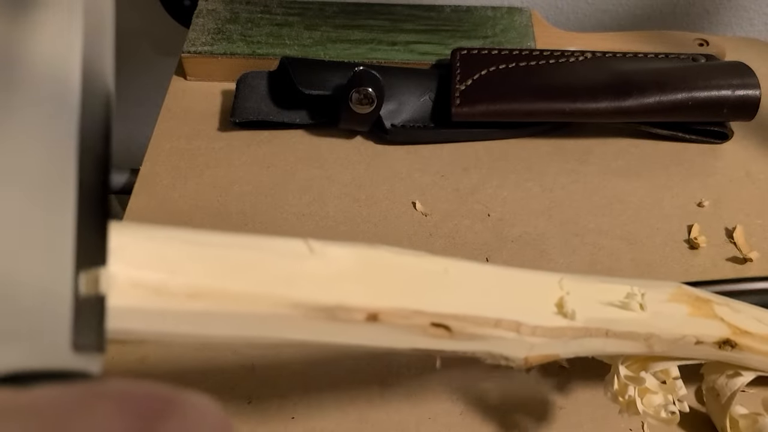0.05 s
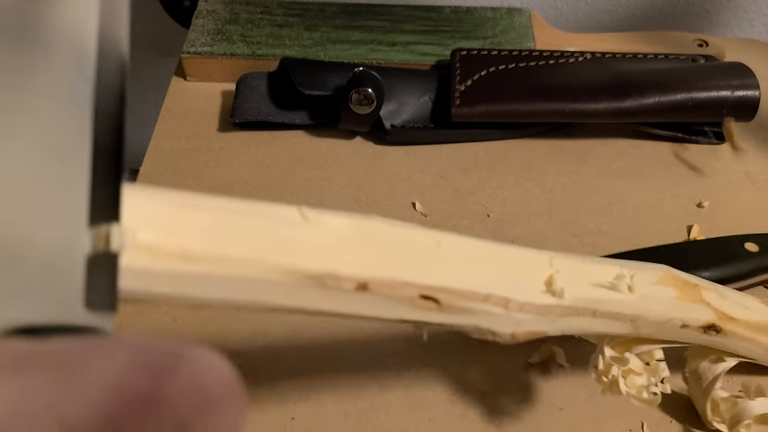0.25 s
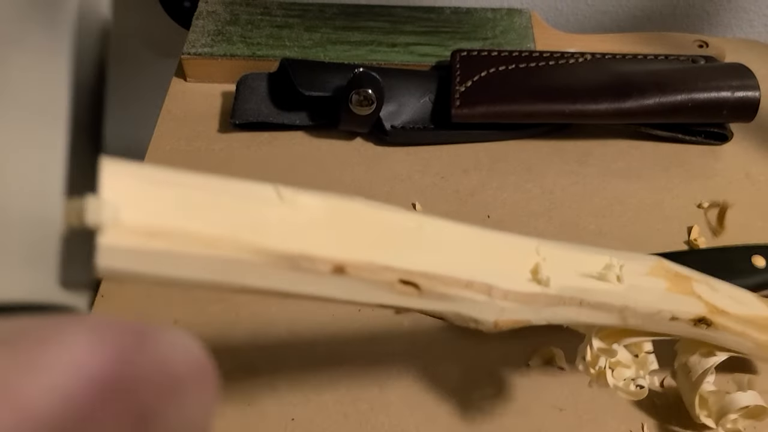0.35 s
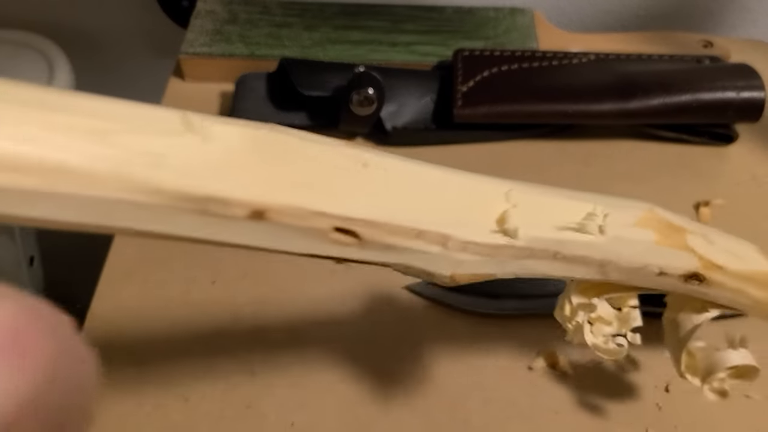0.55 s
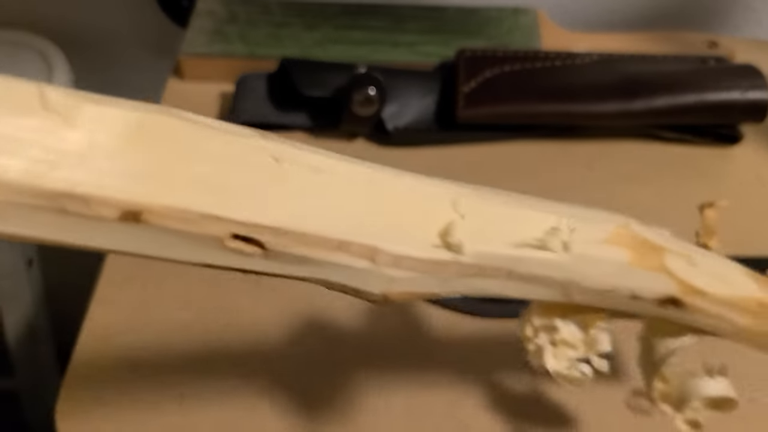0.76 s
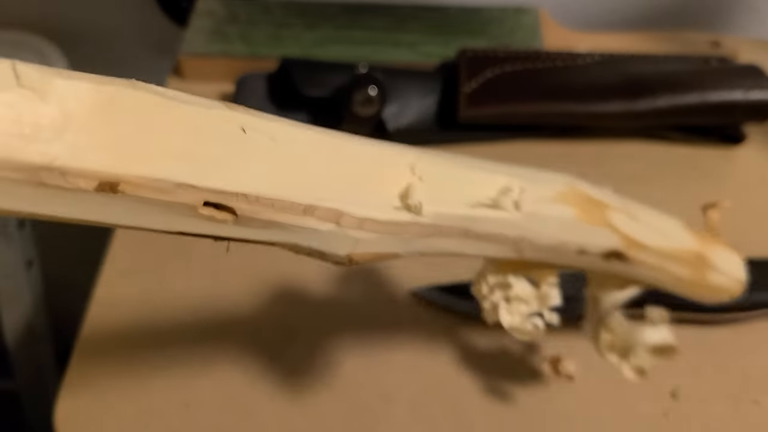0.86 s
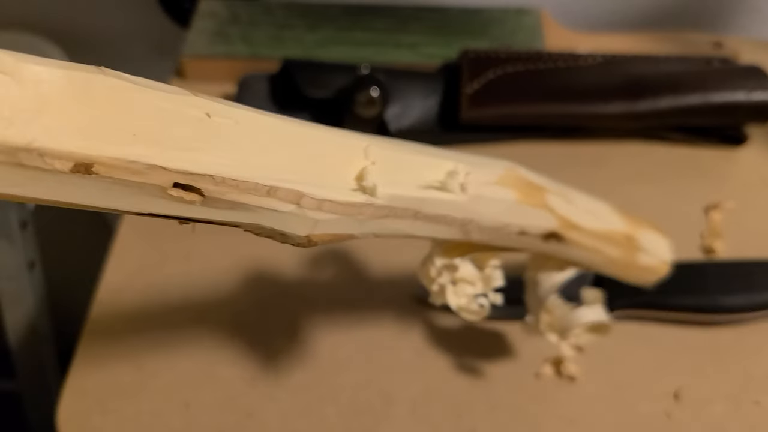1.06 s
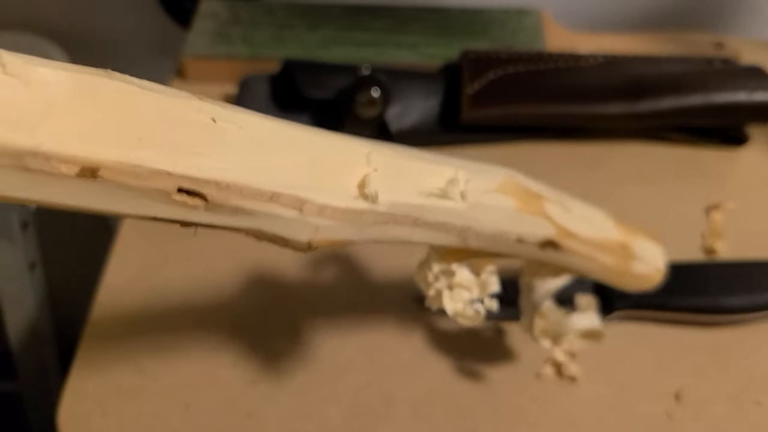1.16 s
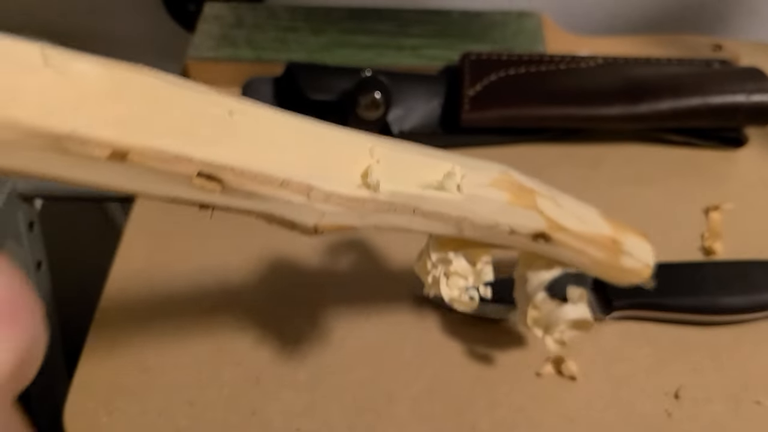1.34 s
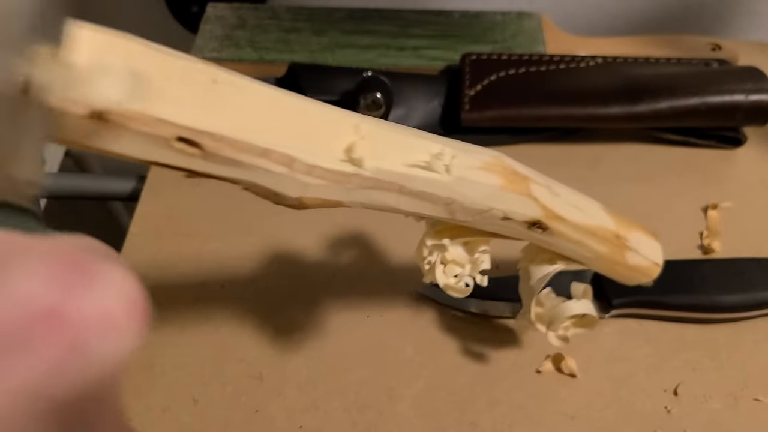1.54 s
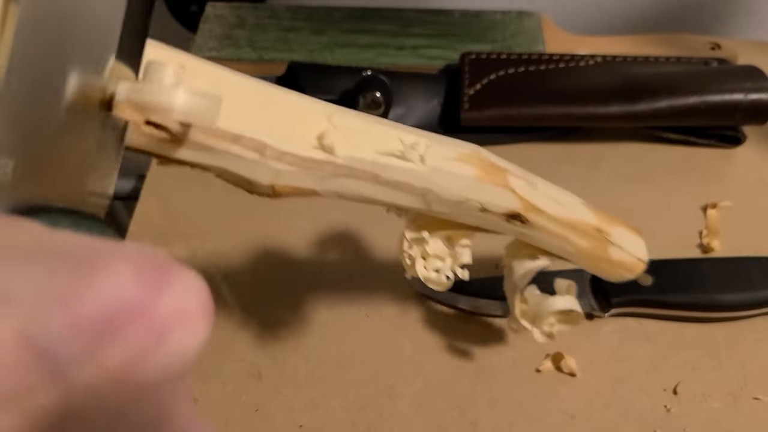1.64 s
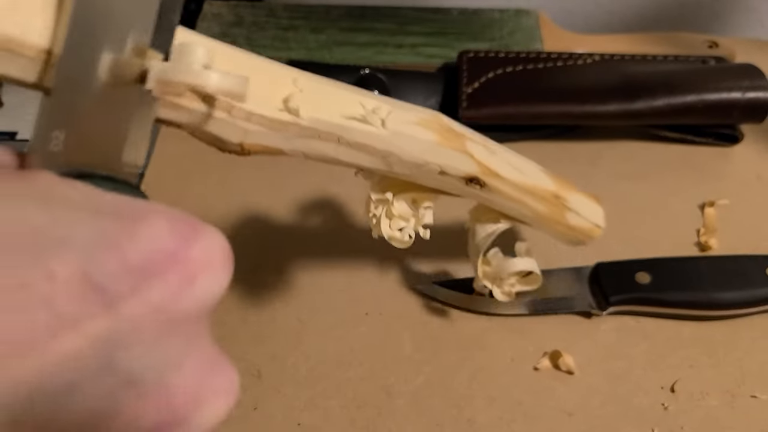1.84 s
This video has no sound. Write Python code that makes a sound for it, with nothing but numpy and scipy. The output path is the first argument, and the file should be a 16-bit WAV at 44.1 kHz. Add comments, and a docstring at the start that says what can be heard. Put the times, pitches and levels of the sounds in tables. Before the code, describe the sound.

A knife lands on a fibreboard table with sharp knocks and a short metallic rattle, settling within half a second; then faint scrapes and tiny fibre ticks on a stick at left, close up in a quiet room.

```python
"""A knife lands on a fibreboard table, bounces and rattles to rest: each contact rings the board and blade.
To the left, a blade and fingers scrape along a wooden stick in short strokes, made of dense noise grains;
the same hiss serves for the knife sliding between its bounces.
Small ticks of breaking fibre, each a short burst of noise, dot the scraping.
Underneath is a quiet room: steady coloured noise, a wavering hum, and a short echo from the walls."""
import sys
import numpy as np
from scipy import signal
from scipy.fft import rfft, irfft, next_fast_len
from scipy.io import wavfile
from scipy.ndimage import uniform_filter1d

SR = 44100
rng = np.random.default_rng(int(sys.argv[2]) if len(sys.argv) > 2 else 0)


def unload_wav(signal):
    """Save mono or channel-first audio to the path in sys.argv[1] as 16-bit WAV at rate SR, clipped to [-1, 1]."""
    wavfile.write(
        sys.argv[1],
        SR,
        np.round(np.clip(np.atleast_2d(signal).T, -1, 1) * 32767).astype(np.int16),
    )


def decibels_to_gain(level_db):
    """Convert a level in decibels to a linear amplitude gain (20 dB per decade)."""
    exponent = np.asarray(level_db, float) / 20
    return 10 ** exponent


N = 83790  # length in samples

# Steady air noise of the room: pitch_hz, level_db (per Hz, relative)
ROOM_SPECTRUM = [(20, -10), (43, -14.5), (155, -2.3), (205, -3.5), (236, -15.5), (450, -11.5), (533, -18),
                 (1100, -20), (3120, -34.5), (4800, -40), (6000, -74), (7600, -65), (9500, -53),
                 (13500, -45), (16400, -66)]
# How alike left and right are in the room noise: pitch_hz, likeness (1 = same, -1 = opposite)
ROOM_LIKENESS = [(60, 1), (240, 0.66), (950, -0.39), (3770, 0.015), (15000, 0.27)]
# Hum of an appliance: pitch_hz, width_hz, level_db (rms)
HUM = [(118, 22, -56.5), (183.2, 9.5, -60), (374, 8, -66), (450.6, 10, -65.5)]
# How long the walls' echo takes to fall by 60 dB: pitch_hz, fade_s
WALL_FADE = [(150, 0.78), (1000, 0.33), (3000, 0.22), (12000, 0.04)]
# How alike left and right are in clatter, fizz and walls: pitch_hz, likeness
NEAR_LIKENESS = [(100, 1), (400, 0.95), (1500, .3), (5000, 0.11)]
# Snapping fibres: start_s, level_db, pitch_hz
FIBRE_TICKS = [(.043, -48, 13670), (.489, -65, 12400), (.636, -72, 9800), (.732, -63.5, 12840),
               (0.821, -66, 10500), (1.04, -46.5, 12100), (1.387, -54, 10200), (1.539, -53.5, 9800),
               (1.563, -49, 12860), (1.586, -42, 14500), (1.654, -66, 13400), (1.847, -52, 13000)]
# Level of the scraping, and of the knife's sliding hiss between its bounces: time_s, level_db
SCRAPE_LEVEL = [(0, -65), (.06, -63.5), (.105, -56), (.14, -71.5), (.2, -59), (.25, -65.5), (.295, -57),
                (.33, -58.5), (.4, -63.5), (.43, -97), (.78, -92), (.81, -71.5), (.96, -89.5), (1.035, -86),
                (1.05, -60.5), (1.09, -90), (1.16, -86.5), (1.175, -62), (1.235, -63), (1.25, -81),
                (1.355, -97.5), (1.375, -66), (1.393, -70.5), (1.402, -88), (1.428, -81), (1.44, -63.5),
                (1.5, -63), (1.55, -58), (1.592, -48.5), (1.62, -63), (1.655, -66.5), (1.675, -94.5),
                (1.695, -62), (1.735, -60.5), (1.77, -64), (1.785, -110), (1.825, -81), (1.845, -59),
                (1.865, -66.5), (1.9, -60.5)]
# Colour of the scraping: pitch_hz, level_db (per Hz, relative)
SCRAPE_SPECTRUM = [(900, -30), (1700, -8.5), (2400, -0.5), (3200, -1.5), (4100, -7.5), (4800, -11.5),
                   (6200, -17), (7300, -17.5), (8300, -13.5), (9000, -3.5), (10500, -12.5), (15100, -11),
                   (16400, -32)]
# Side the hands are on, moving left: time_s, left_over_right_db
HANDS_PAN = [(.15, 1.5), (1.0, 5), (1.3, 9.5)]
# Ring of the blade on light strokes: time_s, over_hiss_db
RASP_LEVEL = [(1.18, -4), (1.4, 0), (1.5, -8), (1.58, -19), (1.72, -16)]
# Colour of the grip's rumble: pitch_hz, level_db (per Hz, relative)
RUMBLE_SPECTRUM = [(50, -9.5), (90, 3), (180, -10.5), (260, -20.5), (500, -54.5)]
# Knife, later the stick's end, meeting the table:
# start_s, strength_db, sharp_up_to_hz, knife_over_board_db, bass_over_mids_db
TABLE_CONTACTS = [(0.041, -42, 830, -8, -33), (0.1238, -26.5, 900, -25, -16.5),
                  (0.161, -29.5, 500, -26, 12.5), (0.1687, -27, 700, -32, -1), (0.2033, -5.5, 6000, -3, -3),
                  (0.2072, -8.5, 3490, 5, -27), (.237, -19, 900, -4, 9), (0.3008, -10.5, 3330, 5.5, 8.5),
                  (0.307, -11.5, 2830, -22, 1.5), (.315, -13.5, 1500, 4, -23), (0.34, -18, 1020, -23, 4),
                  (0.3593, -10.5, 3330, -5, 4.5), (0.366, -18, 3000, -10, 10), (0.397, -15, 1920, -5, 3),
                  (0.412, -23.5, 985, 4, 9), (0.424, -35.5, 980, 15, 18.5), (0.466, -30, 1500, 2, 3.5),
                  (0.519, -45.5, 900, 14, 25.5), (0.548, -35.5, 1400, -0.5, 2.5),
                  (.619, -45.5, 1180, -14, 15.5), (1.041, -43.5, 1490, -10, -2.5)]
# Ringing modes of the board's bass, the board's mids and the knife; fade_s is the time to fall by 60 dB:
# pitch_hz, level_db (relative), fade_s, left_over_right_db
BOARD_BASS_MODES = [(73.4, 0.5, 0.088, 0), (109, -8.5, 0.2, -2), (146.7, -5, 0.14, 2.5),
                    (171.3, -0.5, 0.1, 0), (285.7, -9.5, 0.29, -4.5), (366.2, -6, 0.058, -3)]
BOARD_MID_MODES = [(556.2, 2.5, 0.083, 1), (689.4, -6, 0.3, 7), (777.2, -0.5, 0.081, -1.5)]
KNIFE_MODES = [(1042, -16.5, 0.15, -0.27), (1020, -1, 0.081, -1.8), (1173, -19, 0.17, -1.5),
               (1348, -0.5, 0.032, 0.73), (1397, -13, 0.15, 0), (2016, -6, 0.11, -1.3),
               (2770, -7, .05, -1.5), (3000, -10, 0.05, -1.5), (3000, -9.5, 0.17, -1.5)]
# Many small modes too dense to tell apart: pitch_hz, level_db (per Hz, relative)
CLATTER_SPECTRUM = [(60, -27.5), (200, -12), (550, -0.5), (870, -15.5), (1150, 2), (1650, -23.5),
                    (2000, -16.5), (2450, -22), (3200, -15.5), (5000, -22.5), (8000, -46.5)]
# Their time to fall by 60 dB: pitch_hz, fade_s
CLATTER_FADE = [(200, 0.14), (1000, 0.065), (4000, 0.09), (12000, 0.049)]
# Colour of the treble in each contact: pitch_hz, level_db (per Hz, relative)
FIZZ_SPECTRUM = [(5000, -6), (9000, -2), (15500, -8)]

ROOM_DB = -54  # rms
WALLS_DB, WALLS_DELAY_S = -17.5, 0.014
TICK_FADE_S = 0.013  # to fall by 60 dB
TICK_BROAD_DB, TICK_WIDTH = -1, 0.18  # broad part against the peak; peak width in log pitch
GRAINS_PER_S, PATCHY_DB = 6700, 3
SCRAPE_LIKENESS, SCRAPE_LAG_S = 0.33, 0.00029  # left side comes later
RASP_HZ, RASP_WIDTH_HZ = 5210, 810
RUMBLE_DB = 9  # over the hiss
SCATTER_DB = 2.5  # random change of a mode from blow to blow
RISE_S, DAMP_DB_PER_S = 0.00056, 289.5  # build-up; fading added by the next contact
WANDER_S = 3e-6  # random step of a mode's clock at each sample
RIGHT_LAG_S = 0.0001  # modes reach the right side later
CLATTER_DB = -11
PUSH_DB, PUSH_S = 1.5, 0.0013  # the board's first push
LOW_CUT_HZ = 69  # the microphone's low cut on nearby sounds
FIZZ_DB, FIZZ_FADE_S = -41.5, 0.055
FIZZ_FULL_HZ = 4000  # contact sharpness at which the fizz is neither raised nor lowered


def unit(x):
    """Scales to rms 1."""
    return x / np.sqrt(np.mean(x ** 2) + 1e-20)


def along(points, hz):
    """Reads a table of pitches and values on a log pitch axis."""
    pitch, value = np.transpose(points)
    return np.interp(np.log(hz + 1), np.log(pitch + 1), value)


def at_time(points, seconds):
    """Reads a table of times and values, with straight lines between the points."""
    return np.interp(seconds, *np.transpose(points))


def filtered(x, response):
    """Multiplies the spectrum of x by a response that depends on pitch."""
    n = x.shape[-1]
    m = next_fast_len(n + 8192)
    return irfft(rfft(x, m) * response(np.fft.rfftfreq(m, 1 / SR)), m)[..., :n]


def shares(likeness):
    """Shares of the common and the opposite signal that give this left-right likeness."""
    angle = np.arccos(np.clip(likeness, -1, 1)) / 2
    return np.array([np.cos(angle), np.sin(angle)])


def left_right(mid, side):
    """Turns a common and an opposite signal into left and right."""
    return np.array([mid + side, mid - side])


def pair(noises, likeness):
    """Makes left and right from two noises, with one likeness at all pitches."""
    return left_right(*(shares(likeness)[:, None] * noises))


def blend(noises, spectrum, likeness):
    """Colours two noises and mixes them to a likeness that depends on pitch."""
    return left_right(*filtered(noises, lambda f: decibels_to_gain(along(spectrum, f)) * shares(along(likeness, f))))


def sides(pan_db):
    """Left and right gains for a level difference."""
    half = np.atleast_1d(pan_db) / 2
    return decibels_to_gain([half, -half])


def tail(fade, size):
    """Makes two noises in which each pitch dies away at its own speed."""
    hz, t, z = signal.stft(rng.standard_normal((2, size)), SR, nperseg=128)
    fading = decibels_to_gain(-60 * t / along(fade, hz)[:, None])
    return signal.istft(z * fading, SR, nperseg=128)[1][:, :size]


def add(into, x, start_s):
    """Mixes x in at a start time."""
    k = round(start_s * SR)
    into[:, k:k + x.shape[1]] += x[:, :into.shape[1] - k]


def hum():
    """Narrow bands of noise: the narrower the band, the more slowly its tone wavers."""
    out = np.zeros(N)
    for hz, width, db in HUM:
        band = filtered(rng.standard_normal(N), lambda f: 1 / (1 + ((f - hz) / width * 2) ** 2))
        out += decibels_to_gain(db) * unit(band)
    return out


def room():
    """Steady coloured air noise, with the same faint hum on both sides."""
    air = blend(rng.standard_normal((2, N)), ROOM_SPECTRUM, ROOM_LIKENESS)
    return decibels_to_gain(ROOM_DB) * unit(air) + hum()


def walls(near):
    """The room's short echo: overlapping slices of sound each get a fresh fading noise tail."""
    out, hop = np.zeros((2, N)), SR // 25
    window = np.hanning(2 * hop + 1)[:-1]
    x = np.pad(near, ((0, 0), (hop + round(WALLS_DELAY_S * SR), 2 * hop)))
    for k in range(0, N, hop):
        echo = blend(tail(WALL_FADE, SR // 2), [(100, 0)], NEAR_LIKENESS)
        echo = echo / np.linalg.norm(echo[0])
        answer = signal.fftconvolve(x[:, k:k + 2 * hop] * window, echo, axes=1)
        add(out, answer[:, max(hop - k, 0):], max(k - hop, 0) / SR)
    return decibels_to_gain(WALLS_DB) * out


def ticks():
    """A snapping fibre is a short burst of noise, broad with a peak at its pitch."""
    out, t = np.zeros((2, N)), np.arange(SR // 25) / SR
    for start, db, hz in FIBRE_TICKS:
        def shape(f):
            peak = np.exp(-(np.log((f + 1) / hz) / TICK_WIDTH) ** 2)
            return decibels_to_gain(TICK_BROAD_DB) * decibels_to_gain(along(SCRAPE_SPECTRUM, f)) + peak
        noise = pair(rng.standard_normal((2, len(t))), SCRAPE_LIKENESS)
        burst = unit(filtered(noise, shape)) * sides(at_time(HANDS_PAN, start))
        add(out, decibels_to_gain(db - 60 * t / TICK_FADE_S) * burst, start)
    return out


def scrape_grains():
    """Scraping is many tiny grains of uneven size, whose colour shifts in patches."""
    hits = rng.random((2, N)) < GRAINS_PER_S / SR
    grains = pair(hits * rng.standard_normal((2, N)), SCRAPE_LIKENESS)
    z = signal.stft(grains, nperseg=256)[2]
    # random levels smoothed over pitch, then over time
    patches = uniform_filter1d(rng.standard_normal(z.shape[1:]), size=4, axis=0)
    patches = uniform_filter1d(patches, size=8, axis=1)
    return signal.istft(z * decibels_to_gain(PATCHY_DB * unit(patches)), nperseg=256)[1][:, :N]


def scrape():
    """Hissing grains, a rasping ring and the grip's rumble all follow the level of the scraping."""
    t, grains = np.arange(N) / SR, scrape_grains()

    def lag(f):
        return np.exp(-2j * np.pi * f * SCRAPE_LAG_S * np.array([[1], [0]]))
    hiss = unit(filtered(grains, lambda f: decibels_to_gain(along(SCRAPE_SPECTRUM, f)) * lag(f)))
    rasp = unit(filtered(grains, lambda f: lag(f) / (1 + ((f - RASP_HZ) / RASP_WIDTH_HZ * 2) ** 4)))
    rumble_shape = [(35, -120), *RUMBLE_SPECTRUM, (2000, -120)]
    rumble = unit(filtered(rng.standard_normal(N), lambda f: decibels_to_gain(along(rumble_shape, f))))
    blade = (hiss + decibels_to_gain(at_time(RASP_LEVEL, t)) * rasp) * sides(at_time(HANDS_PAN, t))
    return decibels_to_gain(at_time(SCRAPE_LEVEL, t)) * (blade + decibels_to_gain(RUMBLE_DB) * rumble)


def ringing(t, knife_db, bass_db):
    """Board and knife ring as fading tones; each tone's phase wanders at random, so it sounds less pure."""
    side_t = t - np.array([[0], [RIGHT_LAG_S]])
    out = np.zeros((2, len(t)))
    for modes, lift in ((BOARD_BASS_MODES, bass_db), (BOARD_MID_MODES, 0), (KNIFE_MODES, knife_db)):
        for hz, level, fade, pan in modes:
            clock = side_t + WANDER_S * np.cumsum(rng.standard_normal(len(t)))
            db = lift + level + rng.normal(0, SCATTER_DB) - 60 * t / fade
            out += decibels_to_gain(db) * np.sin(2 * np.pi * hz * clock) * sides(pan)
    return out


def clatter(size):
    """Dense small modes, heard as fading noise with rms 1 over the first 10 ms."""
    noise = blend(tail(CLATTER_FADE, size), CLATTER_SPECTRUM, NEAR_LIKENESS)
    return noise / np.sqrt(np.mean(noise[:, :SR // 100] ** 2))


def fizz(t):
    """Fading treble noise of a contact."""
    noise = rng.standard_normal((2, len(t)))
    treble = unit(blend(noise, [(3000, -120), *FIZZ_SPECTRUM], NEAR_LIKENESS))
    return treble * decibels_to_gain(FIZZ_DB - 60 * t / FIZZ_FADE_S)


def knife():
    """Each contact pushes the board and rings board and knife anew; a softer one loses its treble."""
    out, t = np.zeros((2, N)), np.arange(SR // 3) / SR
    gaps = np.diff([row[0] for row in TABLE_CONTACTS], append=N / SR)
    push = -decibels_to_gain(PUSH_DB) * np.sin(np.pi * t / PUSH_S) * np.exp(-t / PUSH_S)
    for (start, db, sharp_hz, knife_db, bass_db), gap in zip(TABLE_CONTACTS, gaps):
        # the next contact damps the ring
        ring = ringing(t, knife_db, bass_db) * decibels_to_gain(-DAMP_DB_PER_S * np.maximum(t - gap, 0))
        body = ring / 4 + decibels_to_gain(CLATTER_DB) * clatter(len(t))
        blow = body * (1 - np.exp(-t / RISE_S)) + push

        def tone_shape(f):
            soft_contact = (1 + 1.3j * f / sharp_hz - (f / sharp_hz) ** 2) ** 2
            low_cut = (1 - 1j * LOW_CUT_HZ / (f + 1)) ** 2
            return 1 / soft_contact / low_cut
        contact = filtered(blow, tone_shape) + fizz(t) * sharp_hz / FIZZ_FULL_HZ
        add(out, decibels_to_gain(db) * contact, start)
    return out


def scene():
    """Knife, scraping and ticks, with their echo, in the quiet room."""
    near = knife() + scrape() + ticks()
    return near + walls(near) + room()


def top_cut(x):
    """Nothing passes above the cut-off."""
    return signal.sosfilt(signal.butter(12, 16500, fs=SR, output="sos"), x)


def record(dry):
    """Turns the finished mix into the final sound."""
    return top_cut(dry)


dry = scene()
out = record(dry)
unload_wav(out)
```